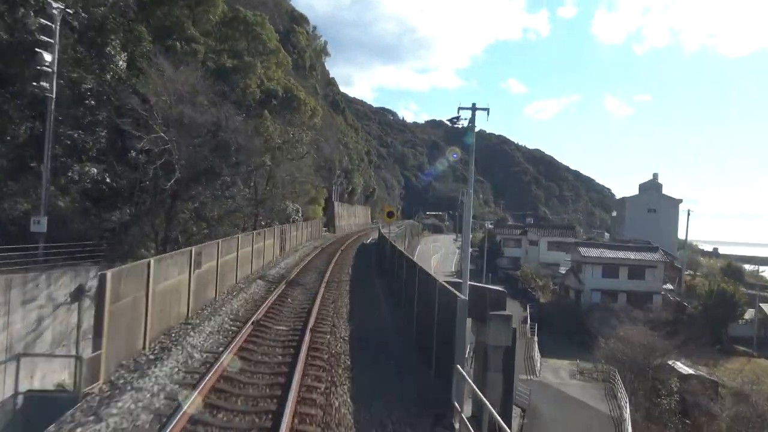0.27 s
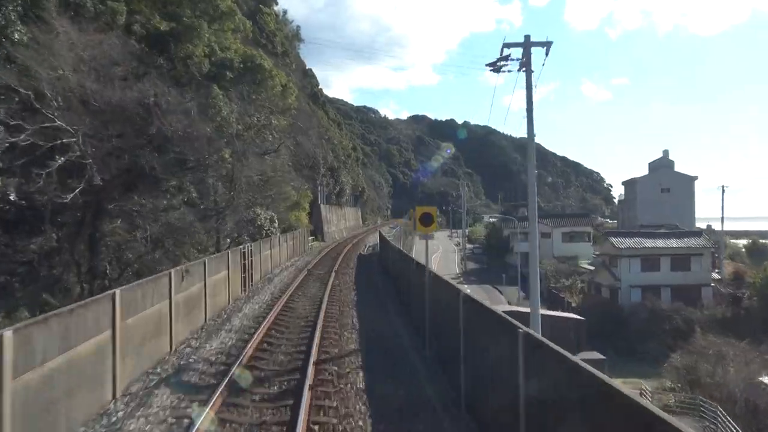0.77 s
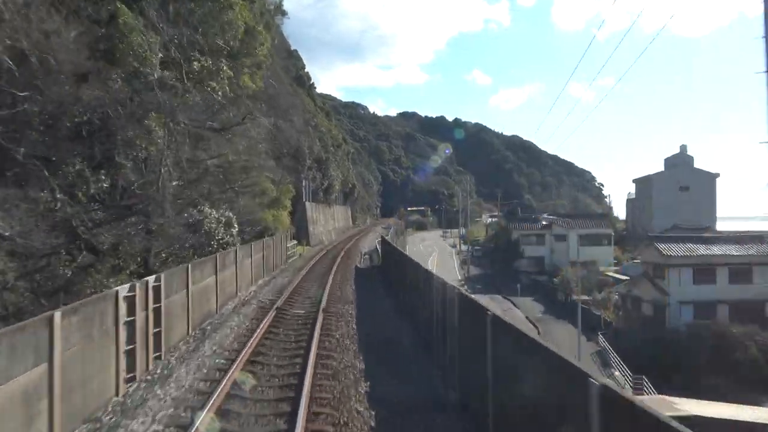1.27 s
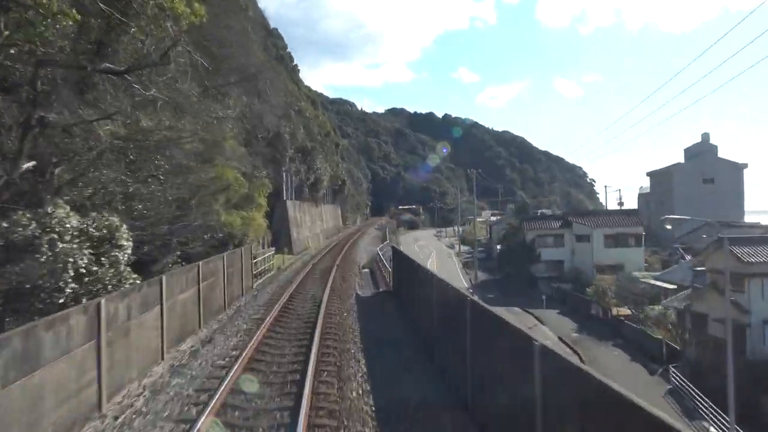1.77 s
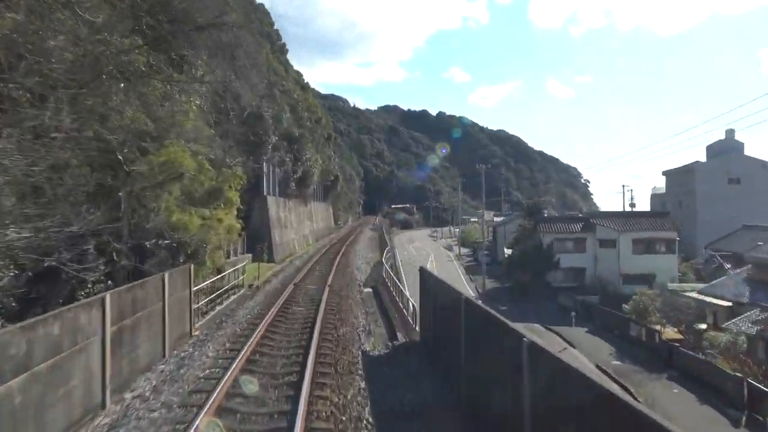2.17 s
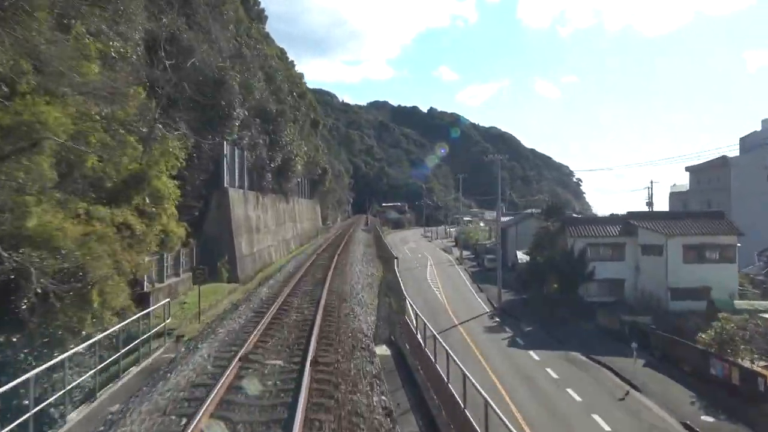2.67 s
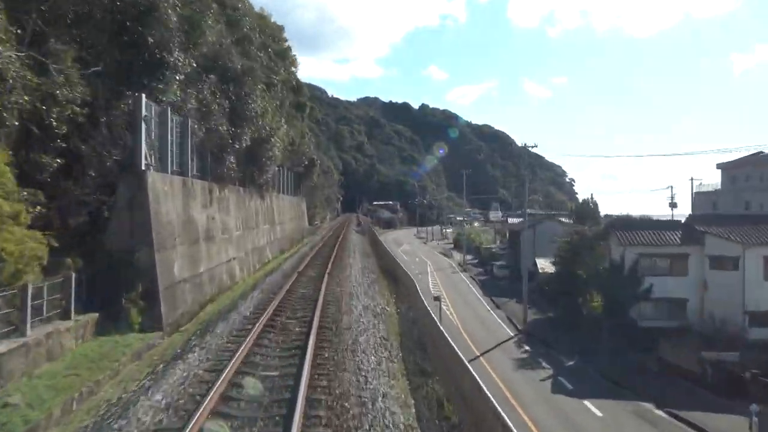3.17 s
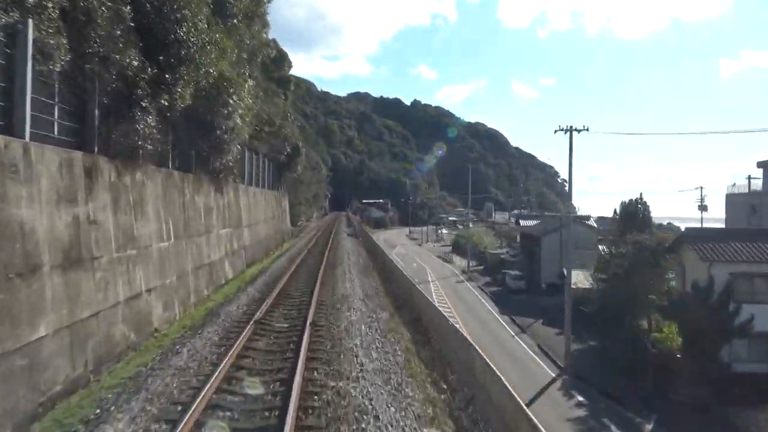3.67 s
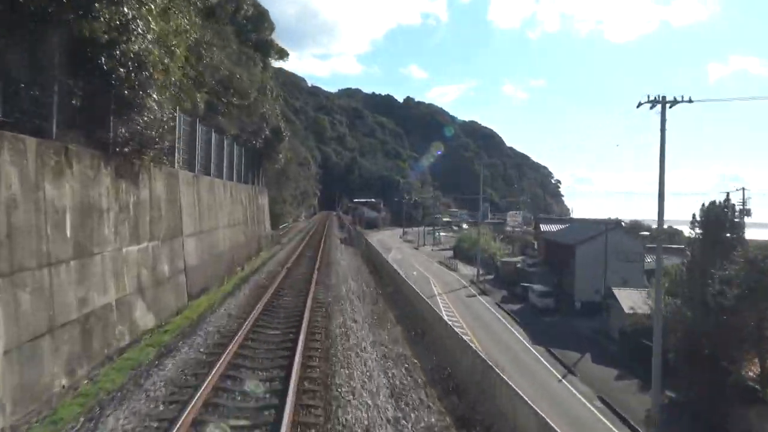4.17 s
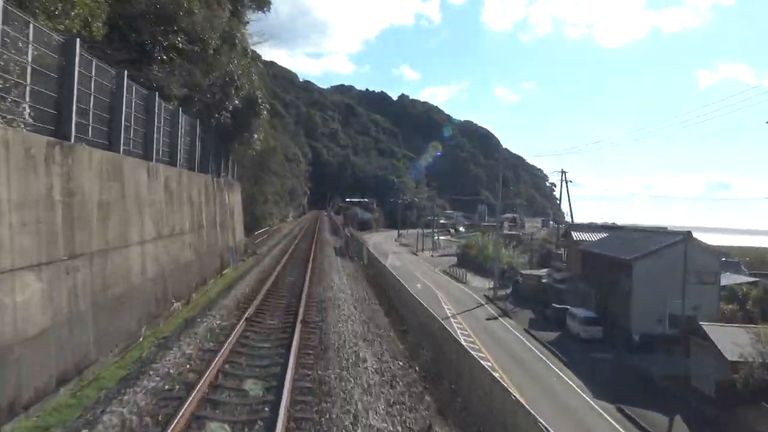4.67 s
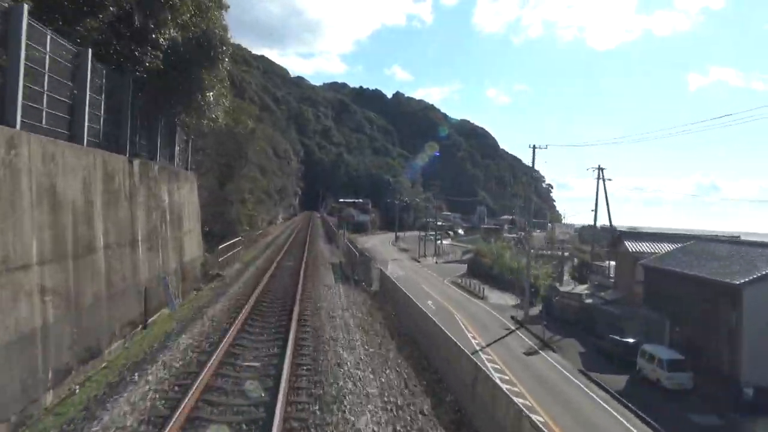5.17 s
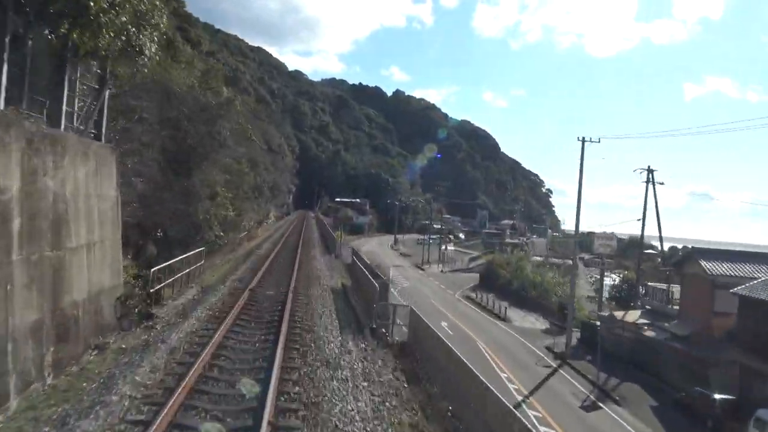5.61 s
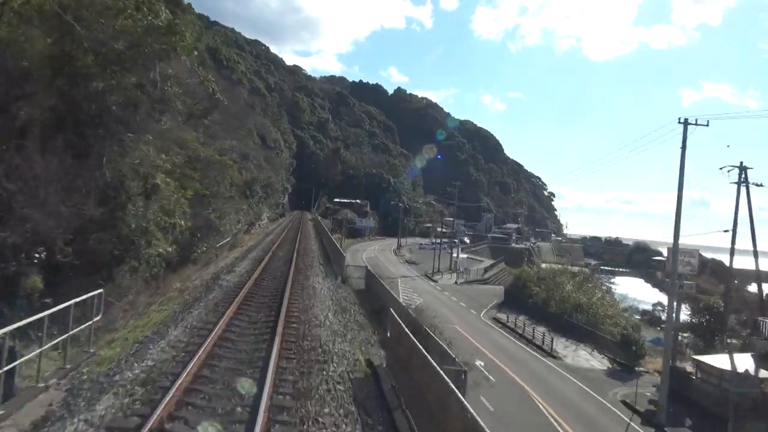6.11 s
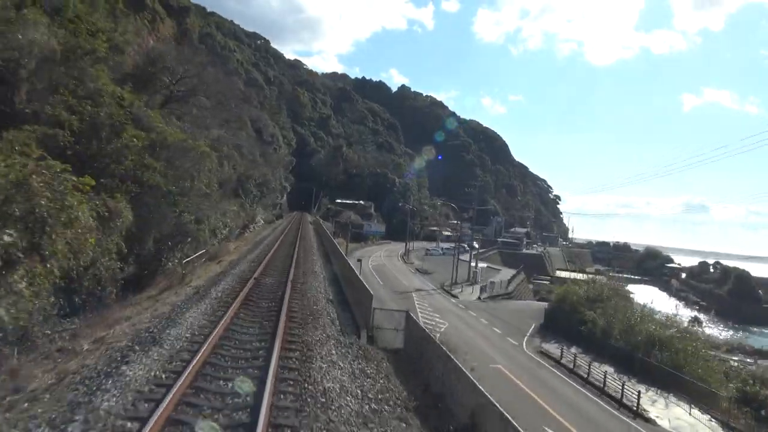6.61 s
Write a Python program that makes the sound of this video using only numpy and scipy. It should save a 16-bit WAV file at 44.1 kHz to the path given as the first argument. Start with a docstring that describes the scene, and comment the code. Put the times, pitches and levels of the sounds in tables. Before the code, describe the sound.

From the start, a diesel engine drones and chugs steadily, heard inside the cab of a moving railcar. Beneath it are a low, booming body rumble and the rough roar of steel wheels on rails. Double knocks from rail joints come about once a second, at roughly 1.1, 2.2, 3.3, 4.5, 5.5 and 6.6 seconds. Faint, very high wheel hiss flares around 1 and 2 seconds, and a wheel sings softly near 0.6 seconds and between 2 and 3.4. Loose fittings tick lightly at the start and around 4 and 5 seconds. The rumble eases between 2 and 4 seconds as the curve straightens. Around 4.5 seconds the engine revs briefly, then dips with a soft puff of air as the gear changes. From 5 seconds it holds a lower note, with quieter wheel noise, until the end near 7 seconds.

```python
"""A diesel engine drones and chugs, heard in the cab of a railcar leaving a curve. Under it the body
rumbles and rough steel wheels roar on the rails. Flanges hiss in the curve, loose fittings tick,
a wheel sings now and then, and the bogie knocks over a rail joint about once a second.
Near five seconds the engine revs briefly, then drops to a lower note as the gearbox changes up
with a puff of air."""
import sys
import numpy as np
from scipy import signal
from scipy.fft import rfft, irfft, next_fast_len
from scipy.io import wavfile
from scipy.ndimage import uniform_filter1d

SR = 44100
rng = np.random.default_rng(int(sys.argv[2]) if len(sys.argv) > 2 else 0)


def generate_wav(sig):
    """Save sig (samples, or channels by samples) to the path in sys.argv[1] as 16-bit PCM at SR."""
    pcm = np.round(np.clip(np.atleast_2d(sig).T, -1, 1) * 32767).astype(np.int16)
    wavfile.write(sys.argv[1], SR, pcm)


N = 302085
TIME = np.arange(N) / SR
FFT_SIZE = next_fast_len(N, real=True)
BIN_HZ = np.maximum(np.fft.rfftfreq(FFT_SIZE, 1 / SR), 1)


def from_db(db):
    """Decibels to gain."""
    return 10 ** (np.asarray(db) / 20)


def unit_rms(x):
    """Scale to an rms of 1."""
    return x / np.sqrt(np.mean(x ** 2) + 1e-20)


def automation(rows):
    """One curve over time for each column after the first."""
    times, *columns = np.transpose(rows)
    return [np.interp(TIME, times, column) for column in columns]


def eq_curve(points):
    """A gain for every frequency, drawn through (frequency [Hz], level [dB]) points."""
    hz, db = np.transpose(points)
    return from_db(np.interp(np.log(BIN_HZ), np.log(hz), db))


def band(points):
    """An EQ curve that rolls off steeply beyond its end points."""
    low_hz, high_hz = points[0][0], points[-1][0]
    return eq_curve(points) / np.sqrt((1 + (low_hz / BIN_HZ) ** 12) * (1 + (BIN_HZ / high_hz) ** 12))


def resonance(hz, modes):
    """The gain of a set of resonant peaks at these frequencies."""
    return np.sqrt(sum(from_db(2 * db) / (1 + (2 * (hz - centre) / width) ** 2) ** 2
                       for centre, width, db in modes))


def drift(rate_hz):
    """Smooth random modulation of rms 1, changing about rate_hz times a second."""
    hop, settle = 40, 2000
    pole = np.exp(-2 * np.pi * hop * rate_hz / SR)
    white = rng.standard_normal(N // hop + settle + 2)
    slow = signal.lfilter([1], [1, -2 * pole, pole * pole], white)[settle:]
    return np.interp(np.arange(N) / hop, np.arange(len(slow)), unit_rms(slow))


def envelope(start, length, attack_s, release_s):
    """Linear attack, hold until length has passed, then an exponential release."""
    age = TIME - start
    return np.clip(age / attack_s, 0, 1) * np.exp(-np.maximum(age - length, 0) / release_s)


# stereo width of the noise: (frequency [Hz], side against mid [dB])
WIDTH = [(60, -21.5), (300, -20.5), (1200, -23), (2800, -29), (5500, -18.5), (9000, -6.5), (11500, -31)]


def noise(spectrum):
    """Shaped stereo noise of rms 1, mostly in the centre."""
    mid, side = rfft(rng.standard_normal((2, FFT_SIZE)))
    stereo = mid + eq_curve(WIDTH) * side * [[1], [-1]]
    return unit_rms(irfft(spectrum * stereo, FFT_SIZE)[:, :N])


# engine revs: (time [s], four-stroke cycle rate [Hz])
REVS = [(0.0, 16.9), (0.6, 17.23), (1.9, 17.67), (2.5, 17.1), (3.0, 17.23), (3.6, 17.7), (4.2, 17.37),
        (4.35, 17.85), (4.57, 18.7), (4.76, 15.6), (4.88, 16.8), (5.0, 12.66), (6.0, 12.75), (6.85, 12.65)]
# engine effort, ducked for the gear change: (time [s], gain [dB])
ENGINE_EFFORT = [(4.55, 0), (4.79, 0), (4.88, -6.5), (5.03, -1), (6.85, 0)]
# air resonances of the cab: (frequency [Hz], width [Hz], gain [dB])
CAB_RESONANCES = [(114.64, 23.2, 0), (138.9, 13.7, -2.5), (158.2, 21.3, -6.5)]
# core of the drone: (order [x cycle rate], level into the cab resonances [dB], waver [dB])
STRONG_ORDERS = [(6, -18.5, 1.0), (8, -31, 4.5), (9, -17, 0.58), (12, -22.5, 4)]
# its fill: (order [x cycle rate], relative level at high revs [dB], at low revs [dB])
WEAK_ORDERS = [(3, -36.5, -42.5), (4, -49.5, -44.5), (5, -40, -46.5), (7, -32.5, -56), (10, -41, -48.5),
               (11, -44.5, -32.5), (13, -43, -43), (15, -49.5, -49), (16, -54, -42), (20, -60.5, -48),
               (24, -59.5, -52)]
# the ninth order, the drone's upper tone, fades and returns: (time [s], gain [dB])
NINTH_FADER = [(0.2, 2), (0.55, -4), (2.05, -8), (2.35, -1), (2.9, 2), (4.0, -3), (4.45, -2.5), (4.75, 0.5)]


def engine(bend, throb_db=-32, weak_db=-2.5, weak_curve_db=2.5, weak_waver_db=2.5,
           jitter_turns=0.003, sway_turns=0.088, scatter_turns=0.59):
    """Unequal cylinders sound multiples of the cycle rate; the revs carry some into cab resonances."""
    cycle_hz, = automation(REVS)
    effort_db, = automation(ENGINE_EFFORT)
    ninth_db, = automation(NINTH_FADER)
    turns = np.cumsum(cycle_hz) / SR + jitter_turns * drift(5.7)
    high_revs = np.clip((cycle_hz - cycle_hz[-1]) / (cycle_hz[0] - cycle_hz[-1]), 0, 1)
    octave_db = ninth_db + np.interp(high_revs, (0, 1), (-48.5, -43.5))
    partials = [(5, from_db(throb_db) * bend, 0),  # throbs against the sixth in the curve
                (18, from_db(octave_db), 0)]  # panels sing the octave of the ninth
    for order, db, waver_db in STRONG_ORDERS:
        fade_db = ninth_db if order == 9 else 0
        drive = from_db(db + fade_db + waver_db * drift(4.7))
        partials.append((order, drive * resonance(order * cycle_hz, CAB_RESONANCES), 0))
    # the swaying body makes the weak orders waver in level and phase
    for order, high_db, low_db in WEAK_ORDERS:
        db = weak_db + weak_curve_db * bend + low_db + (high_db - low_db) * high_revs
        partials.append((order, from_db(db + weak_waver_db * drift(3.9)), sway_turns * drift(4.1)))
    # born of the same firings, the orders stay partly in step, so the drone chugs
    drone = sum(gain * np.sin(2 * np.pi * (order * turns + sway + scatter_turns * rng.random()))
                for order, gain, sway in partials)
    return np.sqrt(2) * from_db(effort_db) * drone


# low end of the swaying body and its floor: (frequency [Hz], level [dB])
BOOM_EQ = [(20, 3), (30, -0.5), (38, -18.5), (46, -16), (53, 9.5), (61, 2), (74, -1.5)]
# rumble of the walls: (frequency [Hz], level [dB])
WALL_EQ = [(70, -2), (118, 3.5), (160, 3), (215, 0.5), (260, -9), (320, -18.5)]
# dips in the track jolt the floor: (time [s], level [dB])
TRACK_DIPS = [(0.31, -31.5), (0.78, -29.5), (1.23, -27), (1.7, -31), (2.28, -29), (3.17, -28),
              (3.42, -25.5), (4.52, -23.5)]


def body(bend, sway_db=(-40.5, -40), floor_db=(-42, -32), walls_db=(-32, -28),
         sway_top_hz=42, evenness=0.48):
    """The body sways, booms and rumbles, harder in the curve; level pairs are (straight, curve)."""
    sway, floor, walls = (from_db(np.interp(bend, (0, 1), db)) for db in (sway_db, floor_db, walls_db))
    jolts = sum(from_db(db) * envelope(start, 0.077, attack_s=0.04, release_s=0.04)
                for start, db in TRACK_DIPS)
    boom = noise(band(BOOM_EQ) * (BIN_HZ > sway_top_hz))
    # compress the boom: the heavy floor swings on steadily between jolts
    boom_power = uniform_filter1d(boom[0] ** 2, SR // 14) + .05
    boom = unit_rms(boom / boom_power ** (evenness / 2))
    sub = noise(band(BOOM_EQ) * (BIN_HZ <= sway_top_hz))
    rumble = noise(band(WALL_EQ))
    return sway * sub + np.hypot(floor, jolts) * boom + np.hypot(walls, wall_thuds()) * rumble


# resonances of wheels, rails and panels: (frequency [Hz], width [Hz], level over the noise bed [dB])
STEEL_MODES = [(375.3, 22.6, 2.5), (730.6, 23, 4), (867, 11, 6.5), (1124, 34, 3.5), (1261, 33, 3),
               (1407, 8.9, 4), (1599, 18, 4.5), (1995, 32, 4.5), (2290, 16, 6), (2568, 34, 2.5),
               (2794, 23, 2.5), (5050, 73, 4.5), (5520, 81, 1), (6470, 80, 4), (6910, 110, 2.5)]


def ringing_steel(eq, swell_db, groups=1):
    """A noise bed with resonances that swell and fade in groups as the contact wanders over the wheel."""
    bed = band(eq)
    out = noise(bed)
    for group in range(groups):
        peaks = bed * resonance(BIN_HZ, STEEL_MODES[group::groups])
        share = np.sqrt(np.sum(peaks ** 2) / np.sum(bed ** 2))
        out += share * from_db(swell_db * drift(1.5)) * noise(peaks)
    return unit_rms(out)


# wheels on rails: (time [s], relative roar level [dB], relative hiss level [dB])
ROLLING_FADERS = [(0.0, -41.5, -58), (0.36, -41.5, -60.5), (1.09, -40.5, -57), (1.47, -40.5, -58),
                  (2.46, -39.5, -55.5), (3.43, -41.5, -56), (4.41, -42.5, -60.5), (6.6, -46.5, -63),
                  (6.85, -45.5, -63.5)]
# their mids, highs and very top, each: (frequency [Hz], level [dB])
ROAR_EQ = [(250, 4.5), (400, 5.5), (520, 3), (660, -1), (900, -5), (1300, -6.5), (1800, -9.5), (2500, -14),
           (3000, -19), (3700, -24.5)]
HISS_EQ = [(3200, 3), (4100, 0), (5000, -0.5), (7000, -2.5), (8500, -5)]
SIZZLE_EQ = [(8800, -1), (11500, -2.5), (13000, -4), (14500, -8.5)]


def rolling(roar_trim_db=3.5, hiss_trim_db=1.0, sizzle_base_db=-67.5, sizzle_swing=1.5):
    """Rough steel roars through the wheel resonances, with a gritty hiss and a fine sizzle above."""
    roar_db, hiss_db = automation(ROLLING_FADERS)
    sizzle_db = sizzle_base_db + sizzle_swing * (hiss_db - hiss_db.mean())
    flutter_db = 0.73 * drift(7.8)
    grit_db = flutter_db + drift(120)
    roar = from_db(roar_db + roar_trim_db + flutter_db) * ringing_steel(ROAR_EQ, swell_db=2.5, groups=3)
    hiss = from_db(hiss_db + hiss_trim_db + grit_db) * ringing_steel(HISS_EQ, swell_db=2.0)
    sizzle = from_db(sizzle_db + grit_db) * noise(band(SIZZLE_EQ))
    return roar + hiss + sizzle


# a flange bites the outer rail: (start [s], length [s], relative level [dB])
FLANGE_BITES = [(0.0, 0.2, -68.5), (0.98, 0.12, -60), (1.82, 0.46, -59.5), (2.92, 0.4, -70),
                (4.02, 0.2, -65)]
# its thin hiss: (frequency [Hz], level [dB])
FLANGE_EQ = [(14500, -24), (15800, -7), (16500, 0), (16600, -15.5)]


def flanges(trim_db=-1.5, rub_db=-70, rub_length_s=5.25):
    """Flanges stick and slip in bursts of very high hiss, rubbing lightly between until they come free."""
    contacts = [(0, rub_length_s, rub_db), *FLANGE_BITES]
    power = sum((from_db(db) * envelope(start, length, attack_s=0.054, release_s=0.13)) ** 2
                for start, length, db in contacts)
    slip_db = drift(35)
    hiss = noise(band(FLANGE_EQ) * (BIN_HZ < FLANGE_EQ[-1][0]))
    return np.sqrt(power) * from_db(trim_db - slip_db) * hiss


# ticks in the cab: (time [s], relative level [dB], band centre [Hz], 60 dB decay [s])
FITTING_TICKS = [(0.160, -28.5, 9000, 0.0054), (0.1625, -6, 900, 0.0077), (4.051, -37, 7500, .01),
                 (4.183, -39.5, 5200, 0.046), (5.201, -35, 4990, 0.015)]


def loose_fittings(trim_db=-5.0, half_width_octaves=0.71):
    """Loose cab fittings make short, well damped contacts, each a snap of band-passed noise."""
    out = np.zeros(N)
    age = TIME[:SR // 10]
    for time, db, hz, t60 in FITTING_TICKS:
        snap = np.exp(-np.log(1000) * age / t60) * rng.standard_normal(len(age))
        edges_hz = [hz / 2 ** half_width_octaves, min(hz * 2 ** half_width_octaves, SR * .45)]
        bandpass = signal.butter(2, edges_hz, "band", fs=SR, output="sos")
        start = round(time * SR)
        out[start:start + len(age)] += from_db(db + trim_db) * signal.sosfilt(bandpass, snap)
    return out


# notes sung by a wheel: (start [s], length [s], pitch [Hz], level [dB])
WHEEL_NOTES = [(0.62, 0.22, 867, -49), (2.1, 0.85, 1995, -56.5), (2.7, 0.67, 1273, -55),
               (4.8, 0.2, 1407, -53)]


def singing_wheel(width_hz=30, attack_s=0.056, release_s=0.054):
    """Sideways slip briefly feeds a single wheel resonance."""
    out = np.zeros(N)
    for start, length, hz, db in WHEEL_NOTES:
        tone = signal.lfilter(*signal.iirpeak(hz, hz / width_hz, fs=SR), rng.standard_normal(N))
        out += from_db(db) * envelope(start, length, attack_s, release_s) * unit_rms(tone)
    return out


def axle_blows(crossings, rise_s, t60_s, axle_gap_s=0.11, second_axle_db=-2.0):
    """A double-hit envelope for each (time [s], level [dB]): one axle, then the next a little softer."""
    force = np.zeros(N + SR)
    age = TIME[:SR]
    blow = (1 - np.exp(-age / rise_s)) * np.exp(-np.log(1000) * age / t60_s)
    for time, db in crossings:
        for delay, axle_db in ((0, 0), (axle_gap_s, second_axle_db)):
            start = min(round((time + delay) * SR), N)
            force[start:start + SR] += from_db(db + axle_db) * blow
    return force[:N]


# the bogie crosses a rail joint: (time [s], relative knock level [dB], wall thud level [dB])
RAIL_JOINTS = [(1.087, -16, -26), (2.209, -20.5, -28), (3.349, -22.5, -34), (4.49, -20.5, -27),
               (5.492, -18, -41), (6.614, -18, -36)]
# the bogie's knock: (frequency [Hz], level [dB])
KNOCK_EQ = [(130, -2), (270, 4.5), (375, 14.5), (520, 9), (720, 2), (1280, -7.5), (2100, -12.5), (2600, -7),
            (2900, -14.5), (3250, -10.5), (3900, -21), (7000, -33.5)]


def rail_joints(knock_trim_db=-12.0, clack_trim_db=-18.0):
    """Each axle clacks on the rail end; the blow swells through the bogie and dies away as a knock."""
    crossings = [(time, db) for time, db, _ in RAIL_JOINTS]
    knock = axle_blows(crossings, rise_s=0.008, t60_s=0.31) * ringing_steel(KNOCK_EQ, swell_db=-3.0)
    clack = axle_blows(crossings, rise_s=0.0025, t60_s=0.056) * noise(band([(1000, 0), (1800, 0)]))
    return from_db(knock_trim_db) * knock + from_db(clack_trim_db) * clack


def wall_thuds():
    """Each joint shakes the walls: a long-tailed envelope for the body's rumble."""
    return axle_blows([(time, db) for time, _, db in RAIL_JOINTS], rise_s=0.012, t60_s=0.98)


# escaping air: (frequency [Hz], level [dB])
AIR_EQ = [(3700, -8), (5000, 2), (7000, -2), (9000, -9), (12500, -13)]


def gear_valve(start_s=4.74, open_s=0.095, level_db=-57.5):
    """The valve vents one short puff of compressed air as the gear changes."""
    puff = envelope(start_s, open_s, attack_s=0.042, release_s=0.03)
    return from_db(level_db) * puff * noise(band(AIR_EQ))


# stereo balance in the cab: (frequency [Hz], left minus right [dB])
CAB_PAN = [(60, 3), (86, 1), (105, 3), (114, 1.0), (152, 2), (230, -1), (1290, -2.0), (2380, -1.0),
           (15000, 0.5)]


def scene(curve_opens_s=2.2, run_out_s=1.6):
    """Everything meets in the cab, panned by frequency: the drone leans left, the rail roar right."""
    bend = np.clip(1 - (TIME - curve_opens_s) / run_out_s, 0, 1)  # 1 in the curve, 0 on the straight
    bed = engine(bend) + body(bend) + rolling()
    details = singing_wheel() + flanges() + rail_joints() + loose_fittings() + gear_valve()
    pan = eq_curve(CAB_PAN) ** np.array([[.5], [-.5]])
    return irfft(rfft(bed + details, FFT_SIZE) * pan, FFT_SIZE)[:, :N]


def record(dry):
    """A tiny fade at each end and a steep high cut."""
    fade_s, cutoff_hz = .004, 16580
    fades = np.clip(np.minimum(TIME, TIME[-1] - TIME) / fade_s, 0, 1)
    high_cut = signal.ellip(12, .1, 80, cutoff_hz, fs=SR, output="sos")
    return signal.sosfilt(high_cut, dry * fades)


dry = scene()
out = record(dry)
generate_wav(out)
```